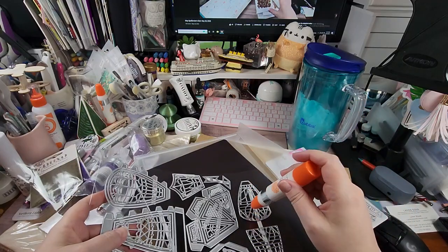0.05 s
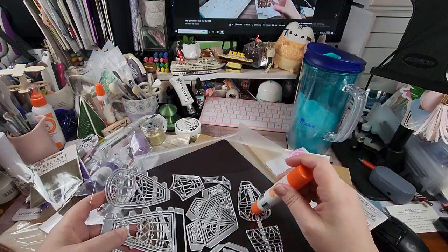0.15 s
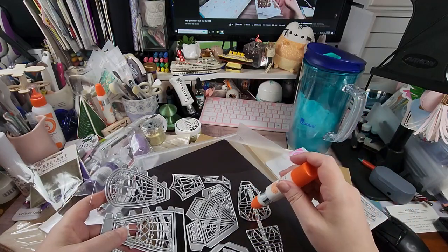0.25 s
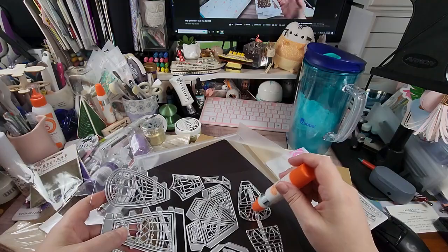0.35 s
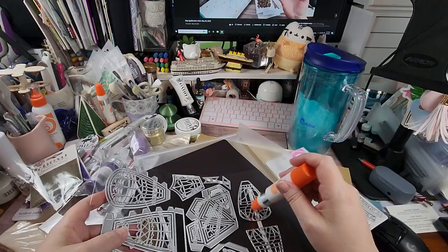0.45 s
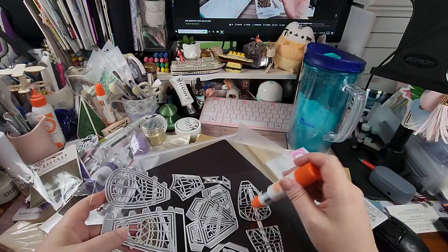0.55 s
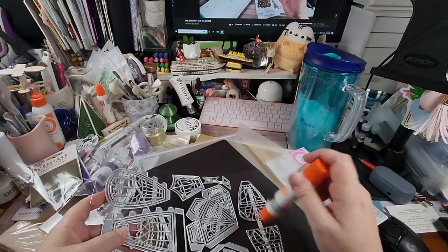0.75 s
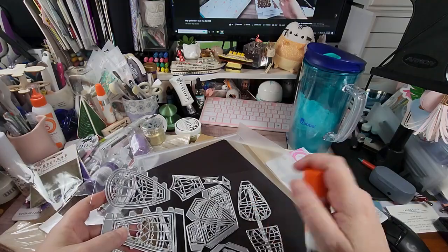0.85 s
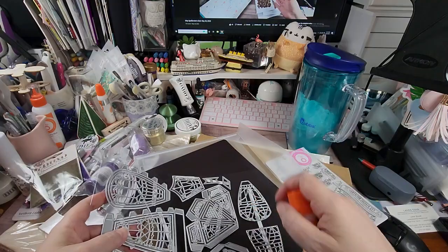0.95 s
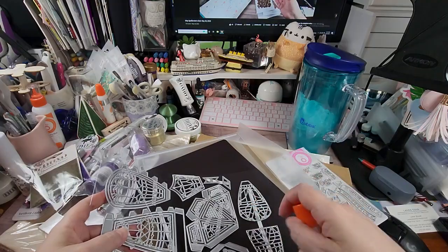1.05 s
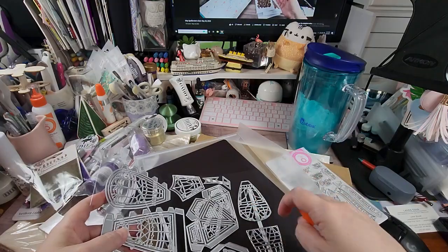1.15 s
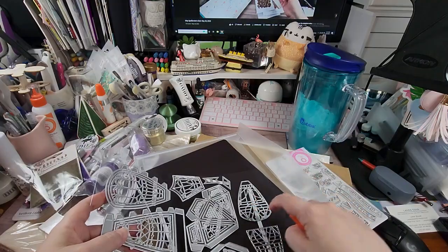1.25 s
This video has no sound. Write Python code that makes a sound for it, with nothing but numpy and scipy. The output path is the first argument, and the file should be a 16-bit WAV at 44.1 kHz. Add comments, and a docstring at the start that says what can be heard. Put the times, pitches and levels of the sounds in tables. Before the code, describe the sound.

A plastic pen taps a plastic sheet lying on a desk, close to a stereo microphone. After quiet room tone, four short, crisp clicks with a small hollow desk knock come at about 0.24, 0.41, 0.58 and 0.76 seconds, the last strongest. Each dies quickly in a small room. Low, gently swelling rumble, faint steady appliance hum and soft hiss run throughout and remain alone until the end, around 1.3 seconds.

```python
"""A plastic pen taps a plastic sheet on a desk four times, close to a stereo camera in a quiet room,
over a low room rumble, an appliance's hum and hiss that last throughout. Each tap is a click with
scattered noise grains, over dying sines for pen tip, barrel, sheet and desk top. Nearby surfaces return
delayed copies, and the room answers with noise that dies at its own speed in each band."""
import sys
import numpy as np
from scipy import signal
from scipy.fft import rfft, irfft
from scipy.io import wavfile
from scipy.ndimage import uniform_filter1d

SR = 44100
rng = np.random.default_rng(int(sys.argv[2]) if len(sys.argv) > 2 else 0)


def ratio_of_db(decibels):
    """Turn decibels (scalar or array-like) into linear amplitude factors; 0 dB maps to 1."""
    return 10 ** (np.asarray(decibels, float) / 20)


def to_wav(sig):
    """Store sig (one row per channel, or 1-D mono) as 16-bit WAV at the path in sys.argv[1].

    Samples outside -1..1 are clipped; the rate is SR.
    """
    pcm = np.clip(np.atleast_2d(sig), -1, 1) * 32767
    pcm = np.round(pcm).astype(np.int16)
    wavfile.write(sys.argv[1], SR, pcm.T)  # frames by channels


N = 57330


def evened(x):
    """Scales to rms 1."""
    return x / np.sqrt(np.mean(x ** 2) + 1e-20)


def read(points, hz):
    """Reads a table on a log-frequency axis."""
    point_hz, value = np.transpose(points)
    return np.interp(np.log(hz + 1), np.log(point_hz + 1), value)


def add(mix, start_s, sound):
    """Mixes a stereo sound in at start_s, cut off at the end of the mix."""
    part = mix[:, round(start_s * SR):][:, :sound.shape[1]]
    part += sound[:, :part.shape[1]]


def sides(pan_db):
    """Left and right gains for a left-over-right level difference."""
    return ratio_of_db(np.array([pan_db / 2, -pan_db / 2]))


def alike(pair, likeness):
    """Gives two unrelated noises a left-right likeness: 1 is mono, 0 unrelated, -1 opposite."""
    left, other = pair
    return np.array([left, likeness * left + np.sqrt(1 - likeness ** 2) * other])


def air():
    """Room rumble, near mono and slowly swelling, under hiss whose left-right likeness varies by band."""
    # colour of the rumble and hiss: hz, level_db (per Hz, relative)
    air_tone = [(12, -30), (20, -0.5), (45, -3.5), (124, -5.5), (175, -5), (236, -17.5), (341, -28),
                (403, -23.5), (491, -29.5), (600, -27), (1000, -36), (2880, -41.5), (6310, -46.5),
                (8400, -47), (9000, -58), (15100, -49.5), (16400, -60.5)]
    # how alike left and right are: hz, likeness (-1 to 1)
    air_likeness = [(60, 0.96), (130, 0.95), (290, 1), (640, 0.17), (1410, 0.47), (3100, 0.088),
                    (6820, 0.42), (15000, -0.48)]
    # swells of the rumble: time_s, level_db
    rumble_swell = [(0, -4.5), (.2, -5), (.45, 0), (.62, 4), (0.901, -1.5), (1.049, 4.5), (1.2, 4.5),
                    (1.3, -1)]
    level_db, patch_db, rumble_top_hz = -59.5, 2.5, 260
    frames, hz = N // 512 + 5, np.fft.rfftfreq(2048, 1 / SR)
    a, b, c, d, patches = rng.standard_normal((frames, 1025, 5)).T
    # small patches of time and frequency stand out or sink
    patches = uniform_filter1d(patches, size=8, axis=0)
    patches = evened(uniform_filter1d(patches, size=5, axis=1))
    likeness = np.clip(read(air_likeness, hz), -1, 1)[:, None]
    z = alike((a + 1j * b, c + 1j * d), likeness)
    swell_db = np.interp(np.arange(frames) * 512 / SR, *np.transpose(rumble_swell))
    swell_db = swell_db / (1 + (hz[:, None] / rumble_top_hz) ** 2)  # fades out above the rumble
    z = z * ratio_of_db(read(air_tone, hz)[:, None] + patch_db * patches + swell_db)
    noise = signal.istft(z, nperseg=2048, noverlap=1536)[1][:, :N]
    return ratio_of_db(level_db) * evened(noise)


def hum():
    """An appliance hums: one steady sine whose level wavers at mixed rates of 1 to 10 Hz."""
    hum_hz, level_db, waver_db = 119.8, -63, 1.3
    t = np.arange(N) / SR
    rates_hz = np.geomspace(1, 10, 12)
    waver = evened(sum(np.sin(2 * np.pi * (rate * t + rng.random())) for rate in rates_hz))
    tone = np.sqrt(2) * np.sin(2 * np.pi * (hum_hz * t + rng.random()))
    return ratio_of_db(level_db + waver_db * waver) * tone


def tail(grain, treble_db, pen_db):
    """The room's answer: dense reflections as noise, each band dying at its own speed."""
    # how fast the room dies: hz, t60_s
    room_decay = [(150, 0.067), (400, 0.1), (1040, 0.11), (2760, 0.13), (7800, .17), (9500, 0.086),
                  (15000, 0.15)]
    # colour of the reflections: hz, level_db (per Hz, relative)
    room_tone = [(59, -22.5), (100, -5.5), (278, -8.5), (409, 8), (528, -10.5), (881, -6), (1190, -18),
                 (1600, -10.5), (1740, -13), (3530, -19.5), (7770, -15.5), (9020, -21), (11400, -19.5),
                 (15000, -30), (16400, -56.5)]
    # how alike left and right are: hz, likeness (0 to 1)
    room_likeness = [(150, 0.87), (400, 0.28), (800, .4), (1600, .1), (8000, .01)]
    level_db, start_s, patch_db = 8, 0.0062, 2
    late_db, late_t60_s = -29, 0.54  # a fainter, longer tail in every band
    tilt_hz = 5950
    pen_room_db, pen_room_hz, pen_room_width_hz = 18.5, 7715, 700
    hz, t, z = signal.stft(grain, SR, nperseg=256)
    z = alike(z, np.clip(read(room_likeness, hz), 0, 1)[:, None])
    fall = ratio_of_db(-60 * t / read(room_decay, hz)[:, None]) + ratio_of_db(late_db - 60 * t / late_t60_s)
    tone_db = read(room_tone, hz) + treble_db / (1 + (tilt_hz / (hz + 1)) ** 2)
    # the barrel's ring carries on in the room
    pen_band = np.exp(-((hz - pen_room_hz) / pen_room_width_hz) ** 2)
    tone_db = tone_db + 20 * np.log10(1 + ratio_of_db(pen_room_db + pen_db) * pen_band)
    patches = evened(uniform_filter1d(z[0].real, size=9, axis=0))  # uneven reflections
    z = z * ratio_of_db(tone_db[:, None] + patch_db * patches) * fall
    out = signal.istft(z, SR, nperseg=256)[1]
    # silent until start_s, full at twice that
    fade_in = np.clip(np.arange(out.shape[1]) / SR / start_s - 1, 0, 1)
    return ratio_of_db(level_db) * out * fade_in


def ring(modes, pitch, swell_turns):
    """Dying sines, moving away from the microphone first, each radiating to its own side.
    Each swells up with a time constant of swell_turns cycles."""
    t = np.arange(SR // 4) / SR
    out = np.zeros((2, len(t)))
    for hz, db, t60, pan_db in modes:
        envelope = ratio_of_db(db - 60 * t / t60) * (1 - np.exp(-t * hz / swell_turns))
        out -= sides(pan_db)[:, None] * envelope * np.sin(2 * np.pi * hz * pitch * t)
    return out


def crack(grain):
    """One click at the contact and a few milliseconds of scattered grains, coloured alike."""
    # colour of the crack: hz, level_db (per Hz, relative)
    crack_tone = [(900, -43), (1600, -16), (2400, -1.5), (3200, -2), (4170, -3.5), (4700, -14.5),
                  (5470, -11.5), (6510, -12), (7740, -4), (8820, -19.5), (11800, -16.5), (16000, -23)]
    # side it radiates to: hz, left_over_right_db
    crack_pan = [(1200, 11.5), (2400, -6), (4400, -0.5), (7500, 16.5), (10000, -6), (15000, 5)]
    likeness, scatter_db, t60_s = 0.7, -7, 0.011
    t, hz = np.arange(grain.shape[1]) / SR, np.fft.rfftfreq(512, 1 / SR)
    scatter = alike(grain, likeness) * ratio_of_db(scatter_db - 60 * t / t60_s)
    log_gain = np.log(ratio_of_db(np.maximum(read(crack_tone, hz), -80)) * sides(read(crack_pan, hz)))
    # minimum phase: the filter's energy comes as early as it can
    full = np.concatenate([log_gain, log_gain[:, -2:0:-1]], axis=1)
    colour = np.fft.ifft(np.exp(np.conj(signal.hilbert(full)))).real
    click = t == 0
    return signal.fftconvolve(scatter - click, colour / np.linalg.norm(colour), axes=1)


def taps():
    """Like taps in one place: crack and rings, with echoes and room mostly shared."""
    # the pen's taps: start_s, strength_db, crack_db and pen_db (trims over strength),
    # desk_pitch (factor)
    tap_list = [(0.2371, -27, -2.5, -20.5, 0.93), (.4120, -26, -3.5, -24, 0.98),
                (0.5828, -24, -3, -22, 0.97), (0.756, -21, -1.5, -27.5, 0.96)]
    # ringing parts, each: hz (before the pitch factor), level_db (relative), t60_s, left_over_right_db
    desk_modes = [(127.4, -8.5, 0.056, 1), (180.6, -9, .09, 0.5), (255, -11.5, 0.017, -7.5),
                  (382.2, 3, 0.032, 2.), (440.3, -14.5, 0.056, -0.5), (678.6, -10.5, 0.033, 1),
                  (754, -8.5, 0.04, -1), (680, -23.5, 0.14, 12), (870, -11.5, .025, 9),
                  (890, -20, 0.13, 2.5), (947, -11.5, 0.03, 11), (965, -12, 0.0097, 10),
                  (1200, -19, 0.012, 7.5)]  # desk top
    sheet_modes = [(1399, -2, 0.026, 1), (1553, -8, 0.016, 8.5), (1562, -27.5, .15, 3), (1942, -24, .02, 0),
                   (2220, -4.5, 0.032, -2.5), (2051, -28, .15, 0.5), (2890, -8, 0.014, -19),
                   (3600, -14.5, 0.0068, 1.5)]  # plastic sheet
    barrel_modes = [(7770, -3.5, 0.02, 14), (7420, -11.5, 0.01, 7.5), (8110, -22.5, 0.00762, -2),
                    (11597, -4.5, 0.038, -13)]  # pen barrel
    tip_modes = [(4110, -10.5, 0.029, .5), (4560, -13, 0.0071, 3), (14300, -22.5, .012, 1),
                 (5202, -3, 0.0069, 4), (5497, -2, 0.0069, 2.5), (6135, -12, .01, 3.5)]  # pen tip, ringing with the crack
    # nearby surfaces: delay_s, level_db, left_over_right_db
    surfaces = [(.0035, -26, 0.5), (.0065, -21.5, 2.5), (.0095, -22.5, 10), (0.015, -21.5, 3),
                (.0165, -34.5, -4.5), (.022, -32.5, -6)]
    desk_db, sheet_db, barrel_db, crack_base_db = 1, -6, 0.5, 9
    swell_turns, desk_swell_turns = 0.2, 0.58  # cycles
    rebound_s, right_lag_s = 0.00095, 0.00015
    crack_fresh, room_fresh = 0.62, 0.8  # new noise in each tap, against 1 of shared noise
    desk_echo_db, room_tilt = -5, 4.5  # tilt: dB of room treble per dB of crack
    out = np.zeros((2, N))
    crack_grain = rng.standard_normal((2, 512))
    room_grain = rng.standard_normal((2, SR // 2))
    for start_s, strength_db, crack_db, pen_db, desk_pitch in tap_list:
        # the desk springs back, towards the microphone first
        desk = -ratio_of_db(strength_db + desk_db) * ring(desk_modes, desk_pitch, desk_swell_turns)
        bright = ratio_of_db(sheet_db) * ring(sheet_modes, 1, swell_turns)
        bright += ratio_of_db(barrel_db + pen_db) * ring(barrel_modes, 0.99, swell_turns)
        bright += ratio_of_db(crack_db) * ring(tip_modes, 1, swell_turns)
        grain = crack_grain + crack_fresh * rng.standard_normal((2, 512))
        add(bright, 0, ratio_of_db(crack_base_db + crack_db) * crack(grain))
        # sheet, pen and crack reach the right microphone slightly later
        turns = np.fft.rfftfreq(bright.shape[1], 1 / SR) * np.array([[0], [right_lag_s]])
        lag = np.exp(-2j * np.pi * turns)
        bright = ratio_of_db(strength_db) * irfft(rfft(bright) * lag, bright.shape[1])
        grain = room_grain + room_fresh * rng.standard_normal(room_grain.shape)
        grain = grain / np.hypot(1, room_fresh)
        add(out, start_s, bright)
        add(out, start_s + rebound_s, desk)
        add(out, start_s, ratio_of_db(strength_db) * tail(grain, room_tilt * crack_db, pen_db))
        reflected = bright + ratio_of_db(desk_echo_db) * desk
        for delay_s, echo_db, pan_db in surfaces:
            add(out, start_s + delay_s, ratio_of_db(echo_db) * sides(pan_db)[:, None] * reflected)
    return out


def scene():
    """Taps over the room's floor."""
    return air() + hum() + taps()


def band_limit(x):
    """A steep low-pass at the top of the band."""
    return signal.sosfilt(signal.butter(12, 16540, fs=SR, output="sos"), x)


def record(dry):
    """The camera's band limit: a steep low-pass at 16250 Hz takes off the top of the treble."""
    edge = signal.firwin(numtaps=255, cutoff=16250, fs=SR)
    mix = signal.oaconvolve(dry, edge[None], "same")
    return band_limit(mix)


dry = scene()
out = record(dry)
to_wav(out)
```